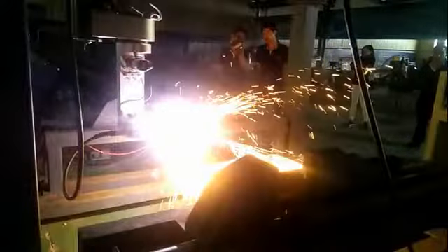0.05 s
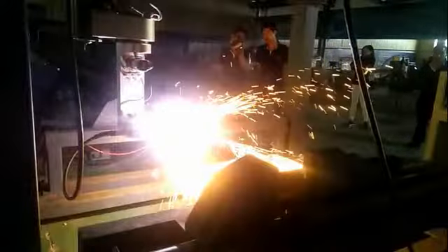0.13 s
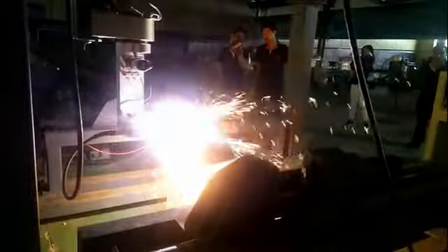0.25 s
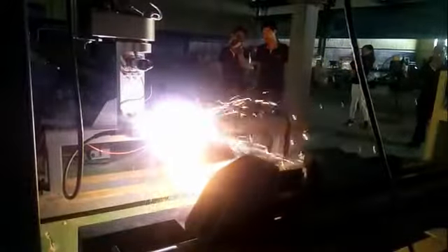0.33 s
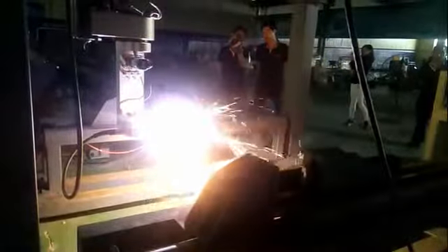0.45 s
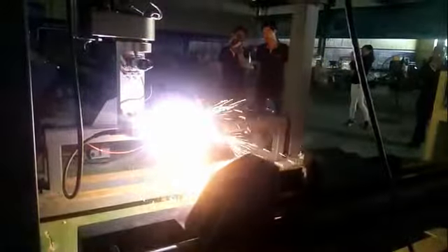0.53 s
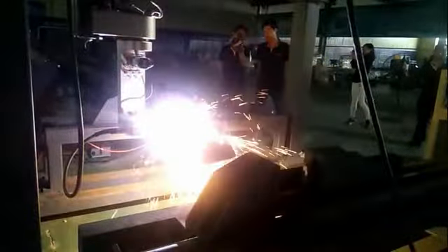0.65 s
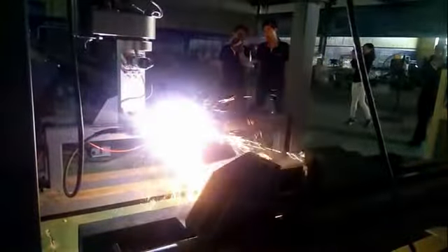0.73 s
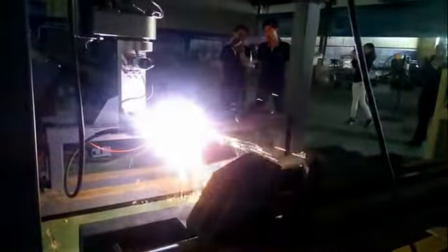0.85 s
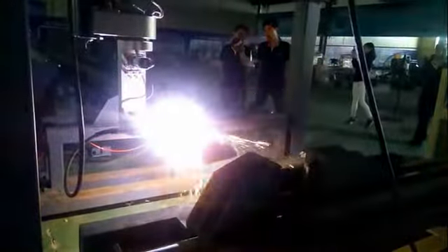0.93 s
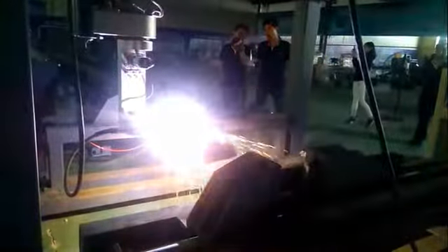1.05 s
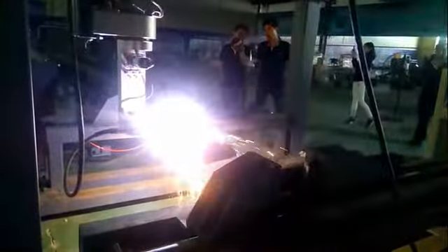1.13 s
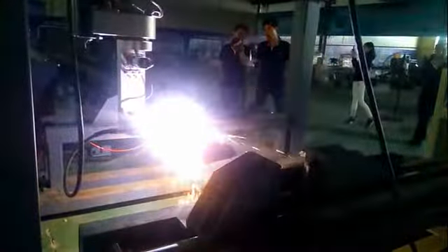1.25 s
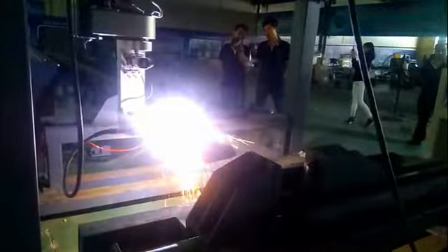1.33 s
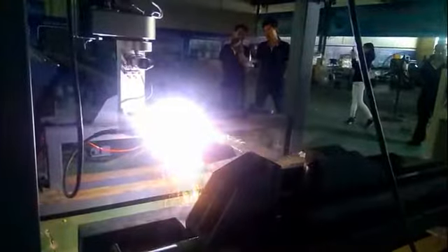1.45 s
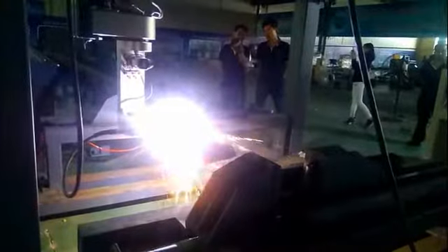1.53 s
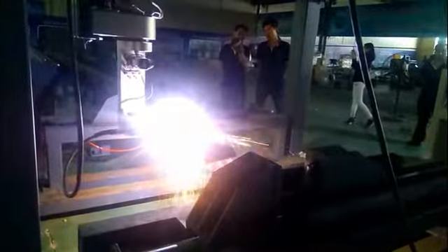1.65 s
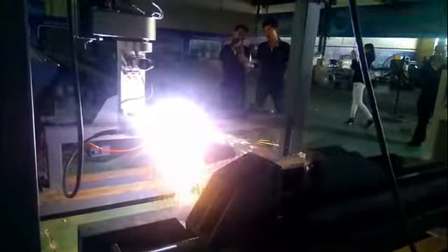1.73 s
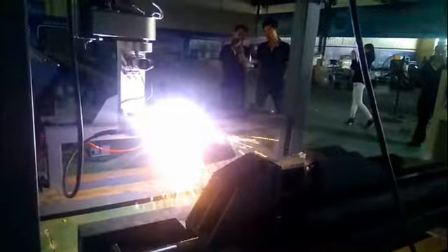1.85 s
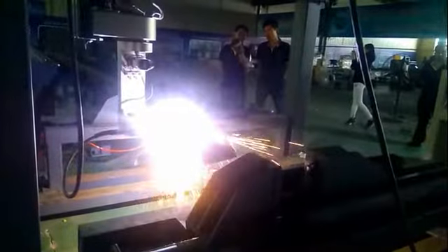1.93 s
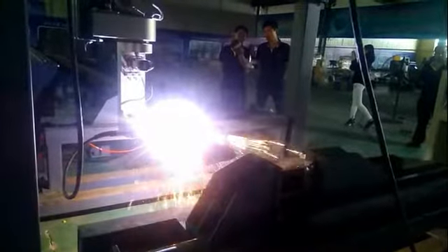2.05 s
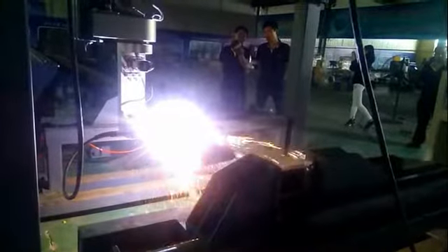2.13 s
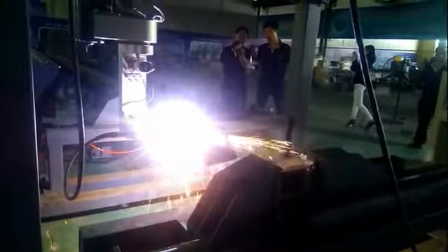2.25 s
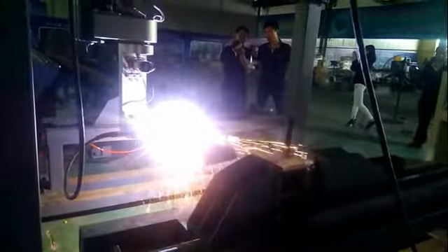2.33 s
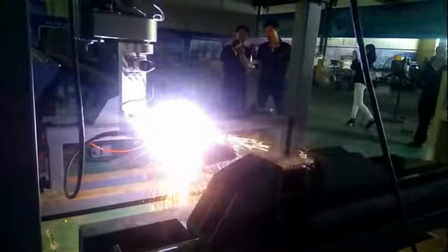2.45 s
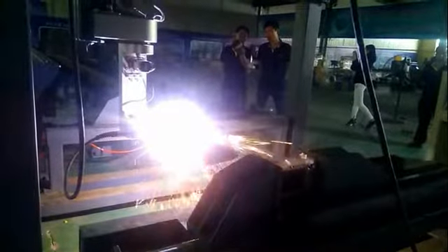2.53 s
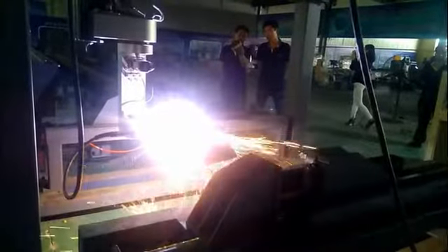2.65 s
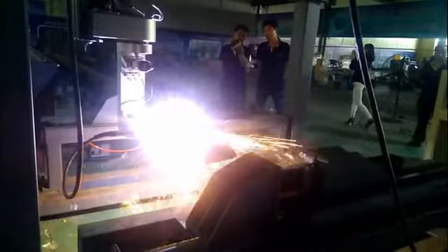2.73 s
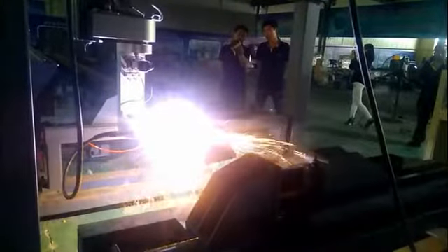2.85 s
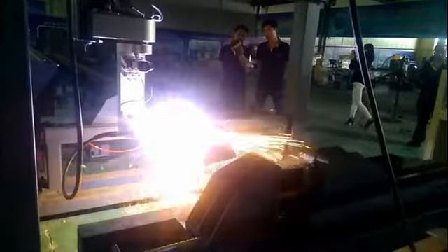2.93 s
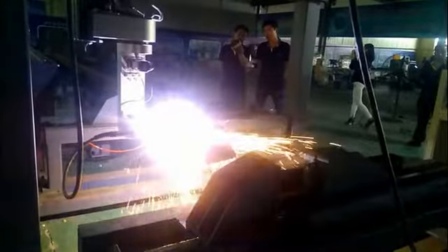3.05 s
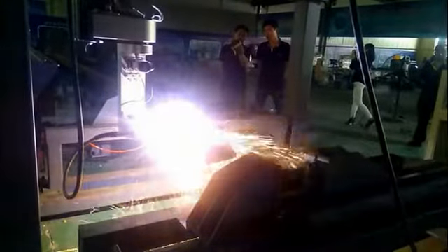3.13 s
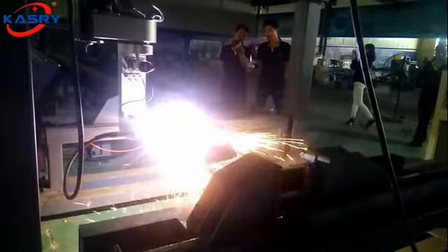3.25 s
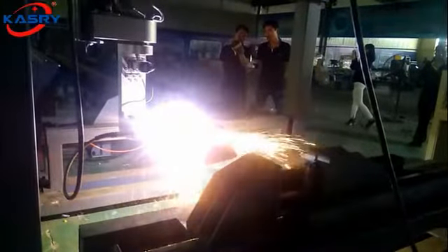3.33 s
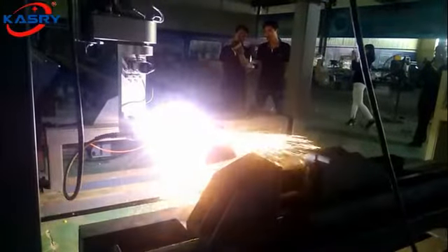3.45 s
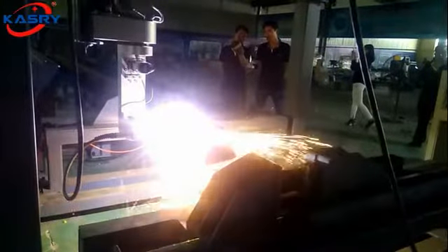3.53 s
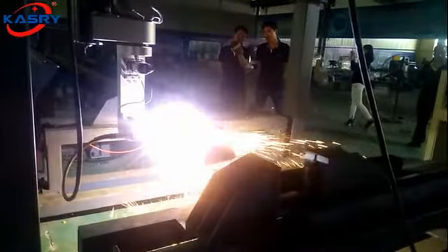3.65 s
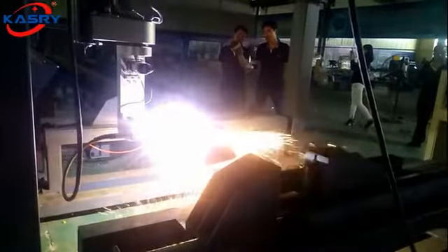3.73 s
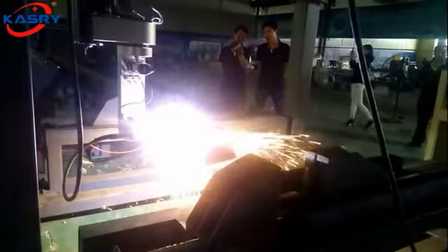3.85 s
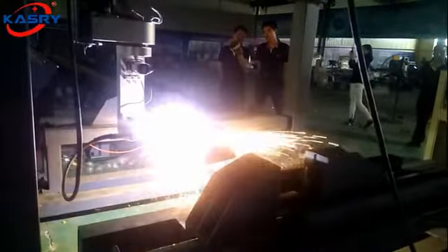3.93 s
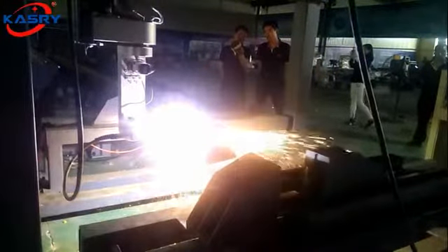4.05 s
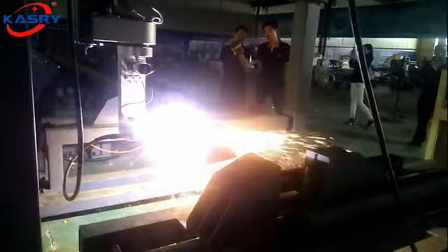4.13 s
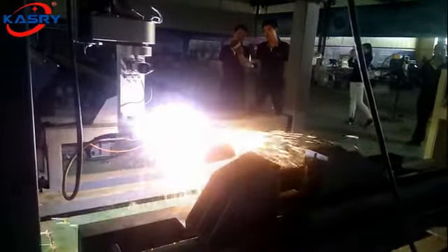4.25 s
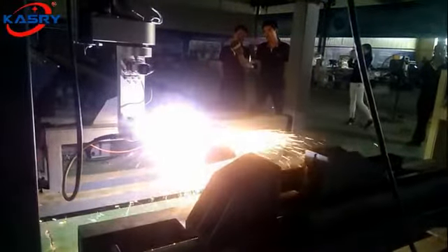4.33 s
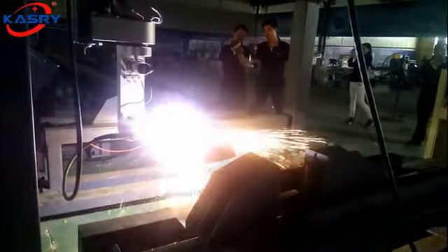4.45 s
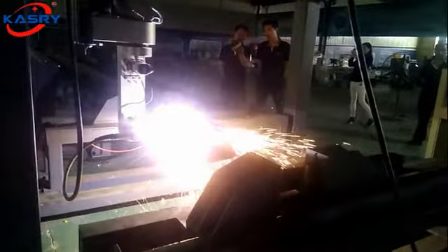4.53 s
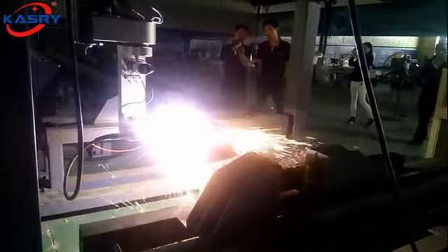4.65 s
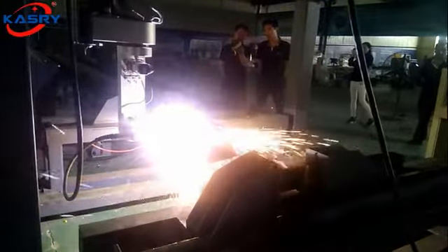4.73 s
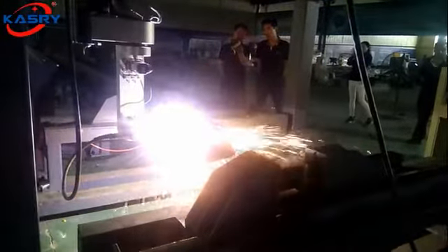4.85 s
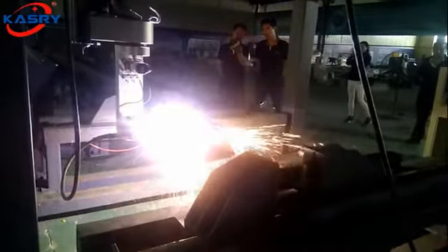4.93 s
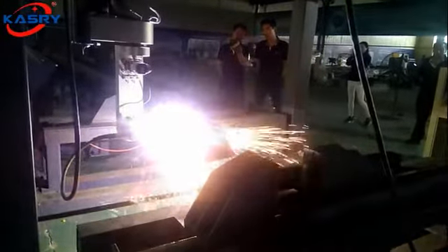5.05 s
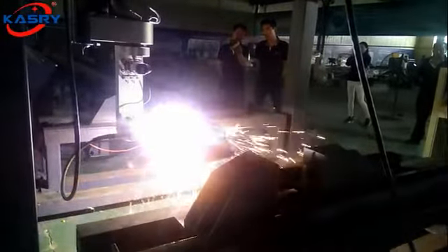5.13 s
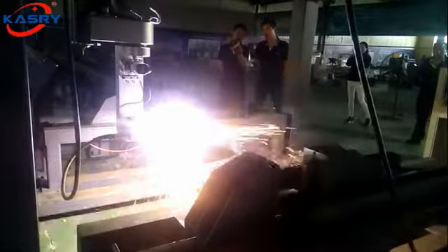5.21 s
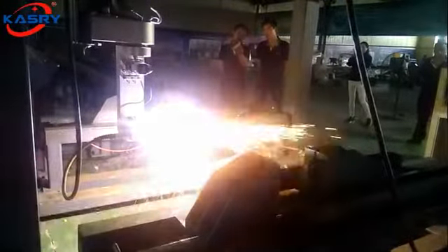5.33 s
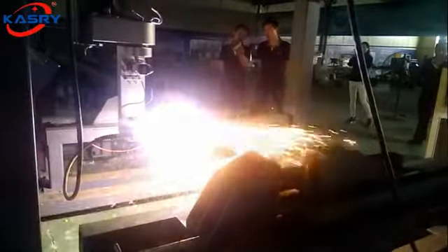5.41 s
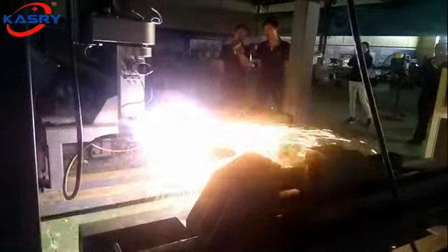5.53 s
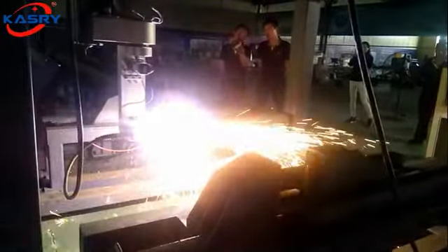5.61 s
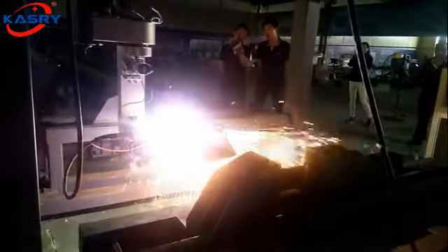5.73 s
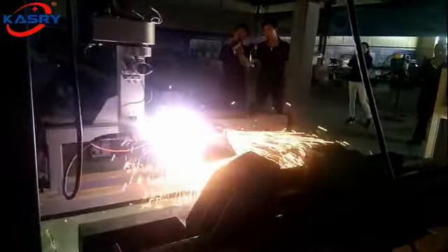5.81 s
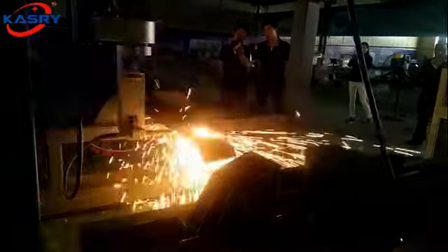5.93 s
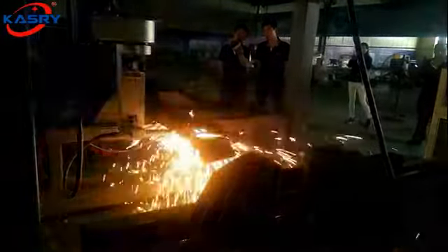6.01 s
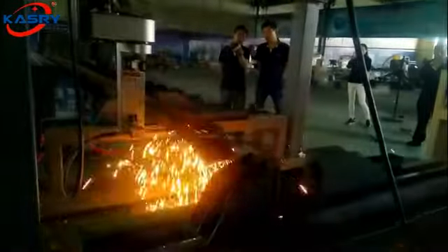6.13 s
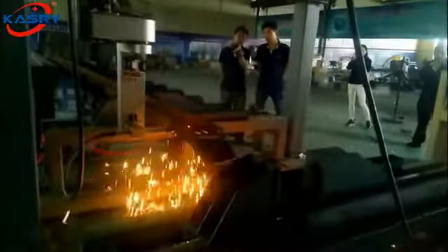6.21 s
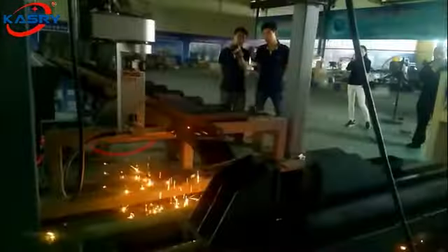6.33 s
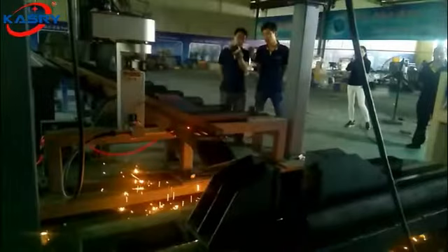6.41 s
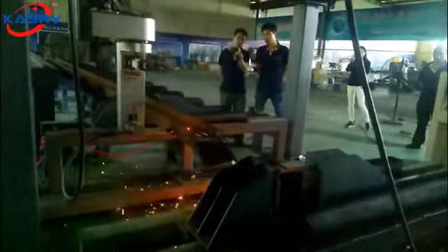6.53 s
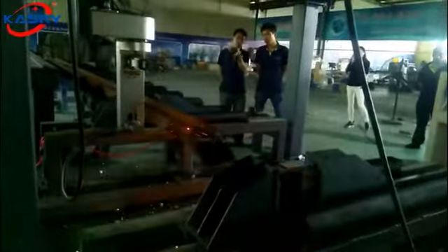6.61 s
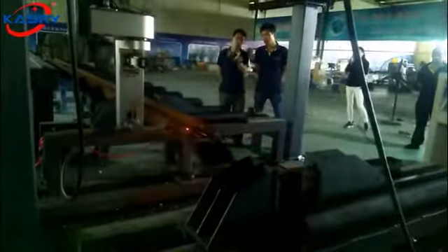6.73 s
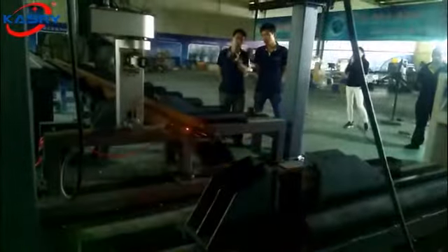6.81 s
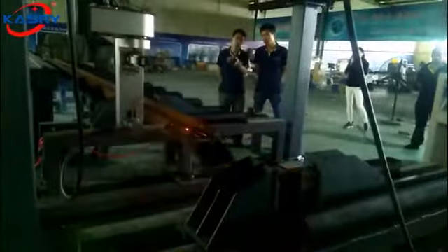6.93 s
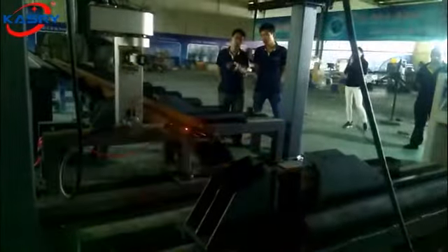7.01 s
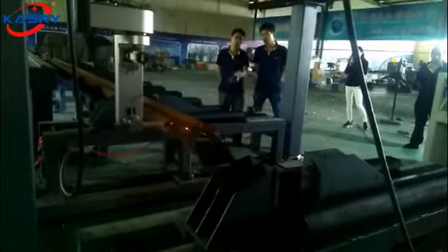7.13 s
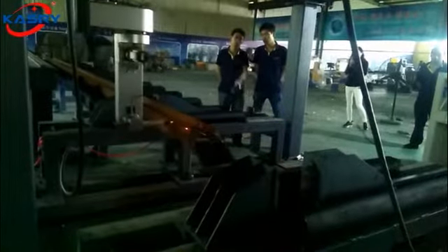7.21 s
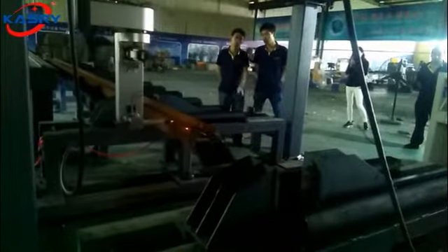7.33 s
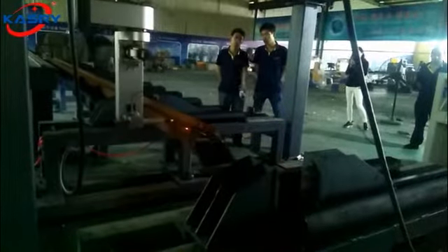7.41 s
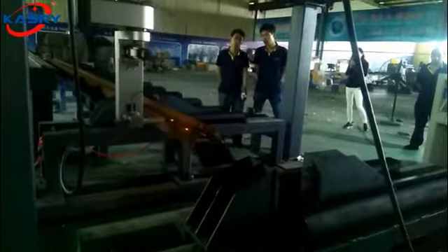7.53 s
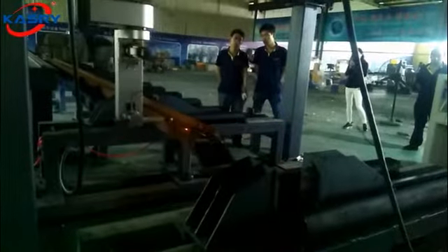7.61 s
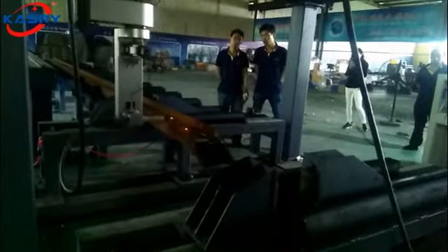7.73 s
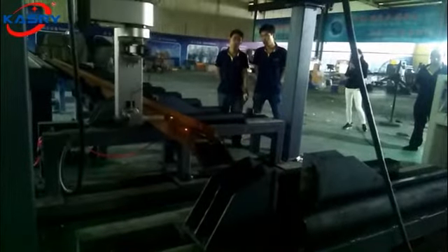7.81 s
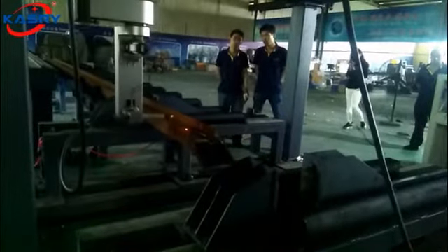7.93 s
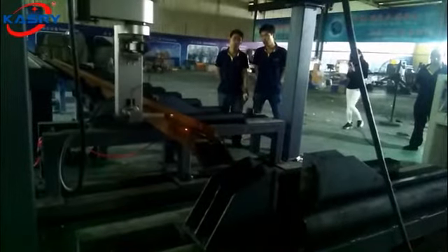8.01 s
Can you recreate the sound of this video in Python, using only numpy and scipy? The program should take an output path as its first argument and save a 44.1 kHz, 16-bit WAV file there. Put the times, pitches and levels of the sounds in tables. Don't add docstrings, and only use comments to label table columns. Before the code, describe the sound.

A fierce jet of plasma gas roars steadily against steel, with shifting metallic resonances and a tiny dropout early on. Far struck metal booms and clanks just before the arc stops. Then the hiss drops sharply to a soft, airy bleed over wavering fan hum in a reverberant workshop; a short motor whine and a loud low boom close it. The small microphone gives little bass and nearly mono sound.

```python
import sys
import numpy as np
from scipy import signal
from scipy.io import wavfile
from scipy.ndimage import uniform_filter1d

SR = 44100
rng = np.random.default_rng(int(sys.argv[2]) if len(sys.argv) > 2 else 0)


def materialize(psi):
    bounded = np.clip(np.atleast_2d(psi).T, -1, 1)
    quanta = np.round(bounded * 32767).astype(np.int16)
    wavfile.write(sys.argv[1], SR, quanta)


def volts(x):
    e = np.asarray(x, float) / 20
    return 10 ** e


N = 355887
FRAME, HOP = 2048, 512
HZ = np.fft.rfftfreq(FRAME, 1 / SR)[:, None]
TIMES = np.arange(N // HOP + 5) * HOP / SR
STOP_S = 5.97

# freq_hz, density_db (per Hz)
JET_SPECTRUM = [(500, -24), (600, -23), (800, -15), (1700, -15.5), (2200, -16), (3300, -15), (4000, -14),
                (4900, -12), (6000, -15), (7000, -14.5), (8300, -13.5), (10000, -22.5), (13000, -20),
                (14200, -19.5), (15700, -18)]
# freq_hz, width_hz, boost_db
BEAM_MODES = [(700, 56, 6), (813, 31, 1.5), (938, 49, 10), (1238, 79, 8), (1425, 71, 8.5)]
# freq_hz, width_hz, boost_db
KERF_MODES = [(2115, 60, 4), (2325, 80, 6), (2545, 85, 7), (2625, 85, 5.5)]
# freq_hz, width_hz, boost_db
NOZZLE_MODES = [(7200, 80, 2.5), (7335, 120, 4), (7560, 160, 3.5), (7750, 80, 4)]
# freq_hz, width_hz, boost_db
STEADY_MODES = [(1570, 40, 3), (1895, 40, 3), (2840, 35, 3.5), (3035, 60, 3.5), (3400, 50, 3),
                (3850, 60, 2.5), (4090, 80, 2), (4300, 100, 2), (4590, 90, 4), (4670, 50, 2.5),
                (5080, 100, 3.5), (5190, 70, 3), (6000, 60, 2.5), (6580, 90, 3.5), (6835, 30, 3.5)]
JET_DB, SAG_DB_PER_S = -21.5, 0.37
STRIKE_DB, STRIKE_S = -5.5, 0.09


def arc():
    t = np.arange(N) / SR
    beam_db, kerf_db, nozzle_db = rings()
    jet_db = JET_DB - SAG_DB_PER_S * t + STRIKE_DB * np.clip(1 - t / STRIKE_S, 0, 1)

    octaves_below = np.maximum(np.log2(500 / (HZ + 1)), 0)
    field = read(JET_SPECTRUM, HZ) - 14 * octaves_below + humps(STEADY_MODES, HZ) + 0 * TIMES
    field = field - band_rms_db(field, 3000, 6800)
    field += humps(BEAM_MODES, HZ) + (beam_db + 3.0) * humps([(1090, 1180, 0.58)], HZ)
    field += humps(KERF_MODES, HZ) * np.clip(1 + (kerf_db + 6.5) / 6, 0, 3)
    field += humps(NOZZLE_MODES, HZ) * np.clip(1.5 + (nozzle_db + 7.0) / 4.4, 0, 3)

    field += humps([(7800, 460, 2.1)], HZ) * np.exp(-(TIMES / 1.1) ** 4)
    piercing = np.clip(TIMES / 0.061, 0, 1) * np.exp(-TIMES / 0.18)
    field += humps([(4600, 1300, 4.1)], HZ) * piercing

    field += 1.6 * chance(size=2, count=24)
    field += 0.53 * chance(size=30, count=7)
    field += 0.3 * chance(size=900, count=4)
    air_pumping = 0.7 * chance(size=900, count=5) + 1.1 * chance(size=12, count=5)
    field += np.clip(HZ / 9000, 0, 1) * air_pumping

    flutter = evened(uniform_filter1d(rng.standard_normal(N), size=120))
    burning = np.clip((STOP_S + 0.036 - t) / 0.018, 0, 1)
    return hiss(field) * volts(jet_db + 0.22 * flutter) * burning


BEAM_DB, BEAM_DB_PER_S, BEAM_WANDER_DB = -12, 1.03, 0.6
KERF_DB, KERF_WANDER_DB = -5.5, 0.66
KERF_FRESH_DB, KERF_FRESH_S = 1.5, 1.3
NOZZLE_DB, NOZZLE_TOP_S, NOZZLE_WANDER_DB = -4, 2.93, 0
NOZZLE_BEND_DB = 1.24
FLARE_S = 0.094
# centre_s, beam_db, kerf_db, nozzle_db
FLARE_EVENTS = [(.2, 2, 3.5, 1), (.54, 4, 3, 5), (1.0, 0, 3, -1), (1.3, -3, 0.5, -2), (1.9, -2, -1, 0),
                (2.15, -1, -1, 7), (2.45, 2.5, -1, -8), (3.6, 3.5, -0.2, 4), (4.45, -1, 1.5, 6),
                (4.8, 1, 0.5, -1), (5.81, 0, 1.5, -10), (5.97, -3, 0.5, 11)]


def rings():
    beam_db = BEAM_DB + BEAM_DB_PER_S * TIMES
    kerf_db = KERF_DB + KERF_FRESH_DB * np.exp(-(TIMES / KERF_FRESH_S) ** 2)
    nozzle_db = NOZZLE_DB - NOZZLE_BEND_DB * (TIMES - NOZZLE_TOP_S) ** 2
    trend = np.array([beam_db, kerf_db, nozzle_db])
    drift = np.array([[BEAM_WANDER_DB], [KERF_WANDER_DB], [NOZZLE_WANDER_DB]]) * wander(count=3)
    return trend + drift + swells(FLARE_EVENTS, FLARE_S, TIMES)


# freq_hz, density_db (per Hz)
GAS_SPECTRUM = [(2500, -25), (3300, -30), (4000, -28), (4900, -25), (5600, -29.5), (6300, -29),
                (7000, -33.5), (8000, -30.5), (9300, -34.5), (10500, -42.5), (11500, -41.5), (12800, -41.5),
                (14200, -39), (15500, -40)]
# freq_hz, width_hz, boost_db
GAS_RESONANCES = [(3920, 270, 3), (4780, 380, 3), (6260, 310, 2.5), (7360, 500, 4.5), (8500, 270, 4.5),
                  (9300, 200, -1), (12700, 320, 3), (14100, 490, 2)]
GAS_DB, BLEED_DB_PER_S = -30, 6.5
AIR_DB, AIR_DB_PER_S = -8.5, 3.5
AIR_POP_DB, AIR_POP_S = 9, 0.096
PUFF_S, PUFF_DB_PER_S = 7.78, 18


def gas():
    age = np.maximum(TIMES - STOP_S, 0)
    puff_db = PUFF_DB_PER_S * np.maximum(TIMES - PUFF_S, 0)
    level_db = GAS_DB - BLEED_DB_PER_S * age + puff_db
    pop_db = AIR_POP_DB * np.exp(-(age / AIR_POP_S) ** 2)
    air_db = AIR_DB + AIR_DB_PER_S * age + pop_db - puff_db

    octaves_below = np.maximum(np.log2(2500 / (HZ + 1)), 0)
    field = read(GAS_SPECTRUM, HZ) - 3.6 * octaves_below + humps(GAS_RESONANCES, HZ) + 0 * TIMES
    field = field - band_rms_db(field, 3200, 9000) + level_db
    field += (air_db + 9.5) * np.clip((HZ - 8500) / 1500, 0, 1)
    field += 1.5 * chance(size=5, count=60)
    field += 0.5 * chance(size=30, count=7)
    blowing = np.clip((np.arange(N) / SR - STOP_S - 0.018) / 0.0091, 0, 1)
    return hiss(field) * blowing


# freq_hz, density_db (per Hz)
DRONE_SPECTRUM = [(60, -57), (100, -61), (130, -60.5), (170, -21), (210, -6), (300, -11.5), (370, -16.5),
                  (520, -23.5), (700, -23.5), (1000, -21.5), (1400, -25.5), (2000, -39), (2800, -42),
                  (4000, -43)]
# blade_hz, waver_hz, share_db
FAN_TONES = [(221.7, 5.2, -3), (284.1, 8.2, -2)]
# time_s, lower_fan_db, upper_fan_db
FAN_LOAD = [(0.0, -39, -53), (0.06, -33, -39), (0.24, -40.5, -37), (1.01, -31, -34.5), (1.34, -49, -39),
            (1.72, -34.5, -33.5), (2.35, -42, -38), (2.51, -29, -39), (2.66, -34.5, -35),
            (4.58, -39.5, -42.5), (5.08, -33, -37.5), (5.24, -40, -48), (5.52, -32.5, -29.5),
            (6.75, -37, -46.5), (7.37, -33.5, -37.5), (7.44, -42, -54), (7.52, -37.5, -43), (7.9, -39, -50)]
# freq_hz, width_hz, level_db
MOTOR_LINES = [(587, 13, 3), (783, 32, 4.5), (1560, 50, -1)]
# centre_s, body_db,
# deep_rumble_db
FLOOR_SURGES = [
    (1.38, -9, 19),
    (2.74, -4, 12),
    (3.1, 0, -3),
    (3.76, 4, -4),
    (4.95, -2, -17),
    (5.4, 9, 7),
    (5.7, 4, 6),
    (6.0, 6, 3),
    (6.55, 2, -9),
    (7.55, 9, -18),
]
SURGE_S = 0.082
BODY_DB, BODY_WANDER_DB, DEEP_DB, DEEP_WANDER_DB = -37, 1.5, -42.5, 2.5
WHINE_S, WHINE_TOP_S, WHINE_END_S = 7.5, 7.68, 7.92
WHINE_DB, WHINE_RISE_DB, WHINE_FALL_DB = -47, 15, 6


def machines():
    t = np.arange(N) / SR
    drift = np.array([[BODY_WANDER_DB], [DEEP_WANDER_DB]]) * wander(count=2)
    body_db, deep_db = np.array([[BODY_DB], [DEEP_DB]]) + drift + swells(FLOOR_SURGES, SURGE_S, TIMES)

    octaves_above = np.maximum(np.log2((HZ + 1) / 4000), 0)
    field = read(DRONE_SPECTRUM, HZ) - 12 * octaves_above
    field = field + humps([(437.0, 60, 9.6), (328, 36, 1.4)], HZ)
    field = field - band_rms_db(field, 320, 520) - 38
    field = field + (body_db + 38) * humps([(390, 430, 0.5)], HZ)
    field = field + (deep_db + 42) * humps([(184, 290, 0.42)], HZ)
    field = field - 4.2 * humps([(244, 112, 1)], HZ)
    wash = hiss(field + 1.4 * chance(size=3, count=12))

    loads_db = follow(FAN_LOAD, t)
    fans = sum(volts(db + load_db) * fan(hz, waver) for (hz, waver, db), load_db in zip(FAN_TONES, loads_db))
    whine = sum(volts(db) * whistle(hz, width) for hz, width, db in MOTOR_LINES)
    running = (t > WHINE_S) & (t < WHINE_END_S)
    below_top_db = np.interp(t, [WHINE_S, WHINE_TOP_S, WHINE_END_S], [WHINE_RISE_DB, 0, WHINE_FALL_DB])
    return wash + fans + volts(WHINE_DB - below_top_db) * running * whine


def fan(hz, waver_hz):
    slow = uniform_filter1d(rng.standard_normal((N, 2)).T, size=2500)
    speed, strength = evened(uniform_filter1d(slow, size=2500))
    phase = 2 * np.pi * np.cumsum(hz + waver_hz * speed) / SR
    tone = np.sqrt(2) * volts(2.4 * strength) * np.sin(phase)
    return tone + volts(-1.3) * whistle(hz * 0.97, 6 * waver_hz)


# start_s, rumble_db, rise_s, t60_s, ring_hz, ring_db
BOOM_EVENTS = [
    (5.285, -31, 0.004, 1.3, 185.6, -34),
    (5.58, -45, .02, 1, 280.5, -31.5),
    (5.388, -40, .002, 0.21, 753, -25.5),
    (5.97, -37, .005, 0.33, 787, -29),
    (7.926, -24.5, 0.012, 1.2, 216, -36),
    (7.98, -19.5, 0.037, 1.2, 207.7, -20.5),
]
# freq_hz, density_db (per Hz)
BOOM_SPECTRUM = [(130, -20), (170, -4.2), (210, 5), (300, -9), (450, -7), (650, -13), (1000, -13),
                 (1500, -17), (2000, -13), (2700, -17), (3300, -25), (4000, -31.1)]
# freq_hz, width_hz, boost_db
BOOM_RESONANCES = [(185, 20, 4), (207, 21, 7), (350, 30, 14), (840, 60, 8), (1040, 30, 5), (1900, 60, 3)]
# ratio, level_db
PLATE_PARTIALS = [(1., 1.5), (.87, -4), (.93, -4.5), (1.08, -12), (1.17, 0), (1.7, -1.5)]


def booms():
    t = np.arange(N) / SR
    out = np.zeros(N)
    octaves_above = np.maximum(np.log2((HZ + 1) / 2900), 0)
    colour = read(BOOM_SPECTRUM, HZ) + humps(BOOM_RESONANCES, HZ) - 24 * octaves_above
    for start_s, rumble_db, rise_s, t60_s, hz, ring_db in BOOM_EVENTS:
        age = np.maximum(t - start_s, 0)
        ring = sum(volts(db) * np.sin(2 * np.pi * (ratio * hz * age + rng.random()))
                   for ratio, db in PLATE_PARTIALS)
        rumble = evened(hiss(colour + 0 * TIMES))
        envelope = volts(-60 * age / t60_s) * (1 - np.exp(-age / rise_s))
        out += envelope * (volts(rumble_db) * rumble + volts(ring_db) * ring)
    return out


# freq_hz, t60_s
HALL_DECAY = [(200, 3), (1000, 2.2), (4000, 0.59), (12000, 0.23)]


def hall(x):
    hz, t, z = signal.stft(rng.standard_normal(SR * 2), SR, nperseg=FRAME)
    decay = volts(-60 * t / read(HALL_DECAY, hz)[:, None])
    tail = signal.istft(z * decay, SR, nperseg=FRAME)[1]
    return signal.fftconvolve(x, tail / np.linalg.norm(tail))[:N]


def hiss(field_db):
    a, b = rng.standard_normal((len(TIMES), len(HZ), 2)).T
    return signal.istft((a + 1j * b) * volts(field_db), nperseg=FRAME, noverlap=FRAME - HOP)[1][:N]


def whistle(hz, width):
    r = np.exp(-np.pi * width / SR)
    noise = rng.standard_normal(N) + 1j * rng.standard_normal(N)
    slow = signal.lfilter([1 - r], [1, -r], noise)
    carrier = np.exp(2j * np.pi * hz * np.arange(N) / SR)
    return evened((slow * carrier).real)


def humps(modes, hz):
    return sum(db / (1 + 2 * ((hz - f) / width) ** 2) ** 2 for f, width, db in modes)


def read(points, hz):
    f, value = np.transpose(points)
    return np.interp(np.log(hz + 1), np.log(f + 1), value)


def band_rms_db(field_db, lo_hz, hi_hz):
    inside = (HZ[:, 0] >= lo_hz) & (HZ[:, 0] < hi_hz)
    power = (volts(field_db[inside]) ** 2).sum(0) * 2 / 3
    return 10 * np.log10(power)


def chance(size, count):
    raw = rng.standard_normal((len(TIMES), len(HZ))).T
    return evened(uniform_filter1d(uniform_filter1d(raw, size, 0), count, 1))


def wander(count):
    raw = uniform_filter1d(rng.standard_normal((len(TIMES), count)).T, size=12)
    raw = uniform_filter1d(raw, size=12)
    return raw / raw.std(axis=1, keepdims=True)


def swells(rows, width_s, t):
    s, *columns = np.transpose(rows)
    return np.array(columns) @ np.exp(-0.5 * ((t - s[:, None]) / width_s) ** 2)


def follow(rows, t):
    s, *columns = np.transpose(rows)
    return [np.interp(t, s, c) for c in columns]


def evened(x):
    return x / np.sqrt(np.mean(x ** 2) + 1e-20)


def scene():
    torch = arc()
    mono = volts(-0.7) * torch + volts(-8.5) * hall(torch) + volts(-0.8) * gas() + machines() + booms()
    return np.array([mono, mono])


# low_hz, high_hz, share_of_moments, level_db (under the mid)
APART_BANDS = [(550, 700, .15, -22), (1700, 2100, .15, -13), (3000, 3400, .02, -13),
               (9700, 10500, .17, -11), (10500, 11200, .08, -11), (12200, 12800, .08, -11),
               (13500, 14300, .05, -10)]
# time_s, centre_hz
FULL_SPLITS = [(1.25, 8900), (1.25, 11700), (1.55, 11000), (1.8, 9600), (2.25, 6200), (2.25, 9900),
               (2.35, 5500), (2.41, 4700), (2.51, 13800), (2.72, 5200), (2.79, 15000), (3.16, 8900),
               (3.16, 4700), (3.21, 5000), (3.21, 10400), (3.27, 5100), (4.18, 8200), (4.2, 11700),
               (4.28, 6300), (4.69, 8200), (5.37, 11700), (5.88, 13200), (5.92, 14700), (6.14, 5600),
               (6.14, 10000), (6.14, 14100), (6.41, 6300), (7.13, 6600), (7.27, 6900), (7.48, 6300)]
SPLIT_WIDTH_HZ = 1500


def parted(mid):
    hz, t, z = signal.stft(mid, SR, nperseg=FRAME)
    share = sum(volts(db) * ((hz > lo) & (hz < hi))[:, None] * (rng.random(len(t)) < p)
                for lo, hi, p, db in APART_BANDS)
    for s, centre_hz in FULL_SPLITS:
        share[abs(hz - centre_hz) < SPLIT_WIDTH_HZ / 2, np.argmin(abs(t - s))] = volts(-1.5)
    turned = z * share * np.exp(2j * np.pi * rng.random(z.shape[::-1]).T)
    return signal.istft(turned, SR, nperseg=FRAME)[1][:N]


def band_limit(x):
    return signal.sosfilt(signal.butter(12, 17080, fs=SR, output="sos"), x)


SKIP_S, SKIP_BACK_S = 1.7405, 0.018
BASS_CUT_HZ, EDGE_HZ = 145, 15760


def record(dry):
    age = np.arange(N) / SR - SKIP_S
    skip = np.where(age < 0, 1, np.clip(0.1 + age / SKIP_BACK_S, 0, 1))
    mid = dry[0] * uniform_filter1d(skip, size=30)
    mid = signal.sosfilt(signal.butter(4, BASS_CUT_HZ, "high", fs=SR, output="sos"), mid)
    treble_edge = signal.firwin(1023, EDGE_HZ, window=("kaiser", 10), fs=SR)
    mid = signal.oaconvolve(mid, treble_edge, "same")
    side = parted(mid)
    mix = np.array([mid + side, mid - side])
    return band_limit(mix)


dry = scene()
out = record(dry)
materialize(out)
```